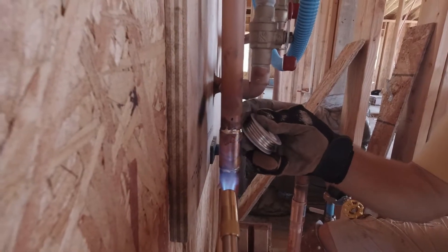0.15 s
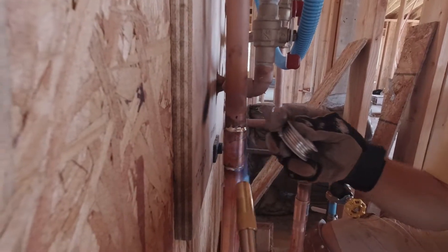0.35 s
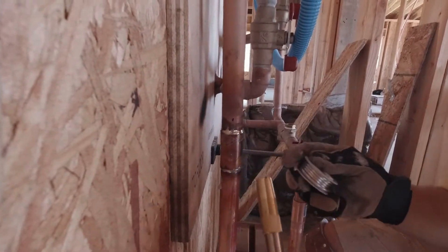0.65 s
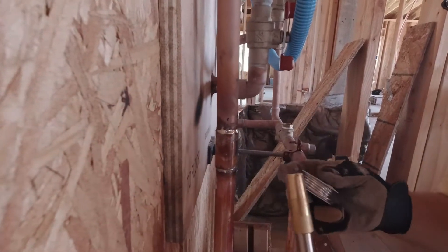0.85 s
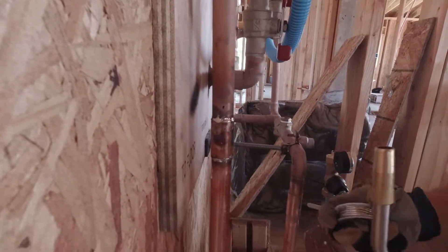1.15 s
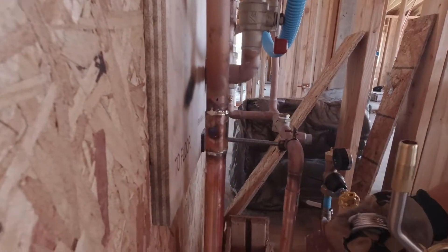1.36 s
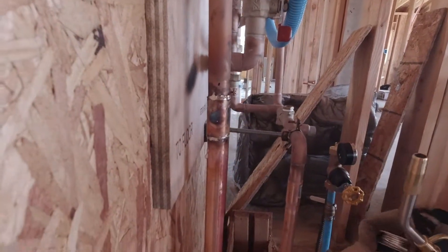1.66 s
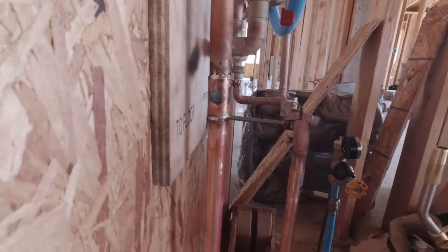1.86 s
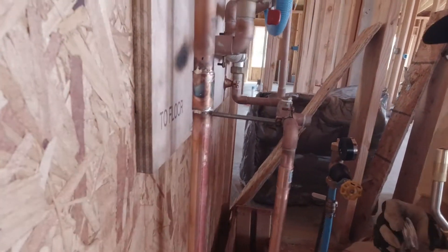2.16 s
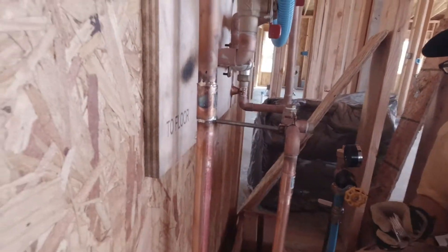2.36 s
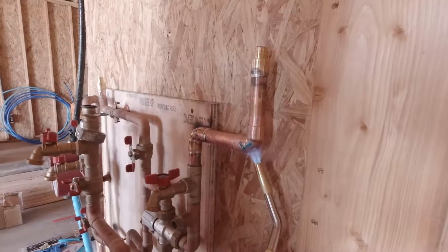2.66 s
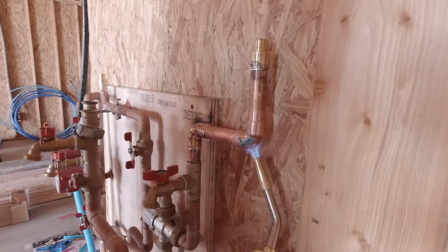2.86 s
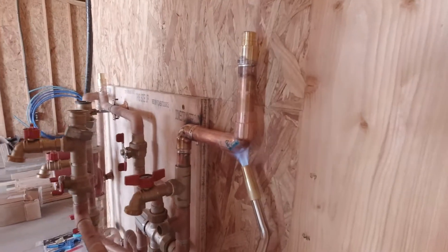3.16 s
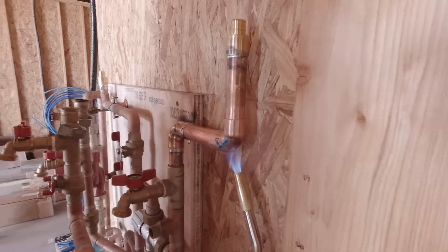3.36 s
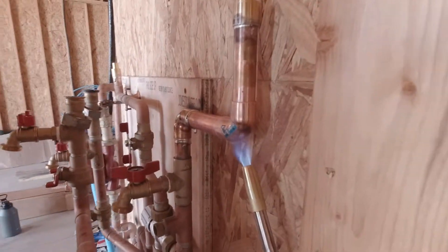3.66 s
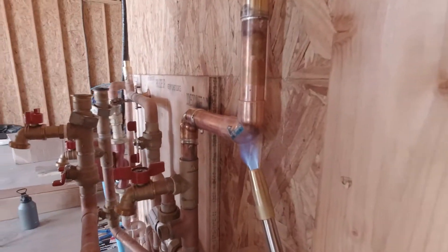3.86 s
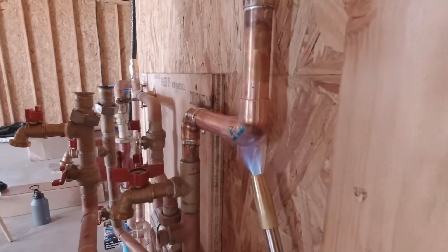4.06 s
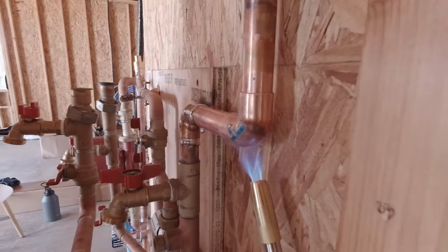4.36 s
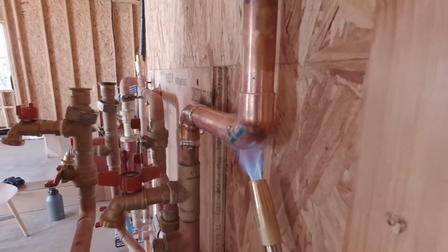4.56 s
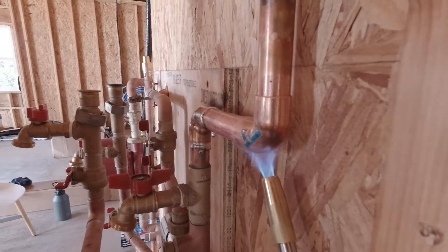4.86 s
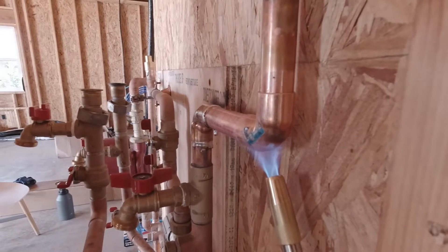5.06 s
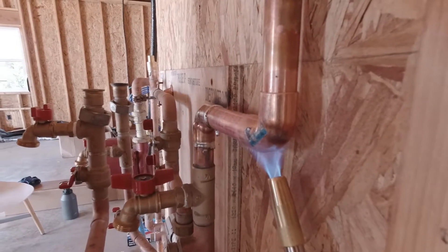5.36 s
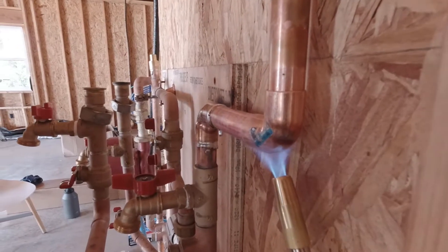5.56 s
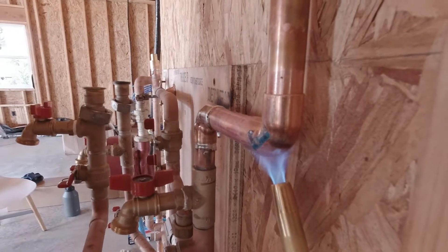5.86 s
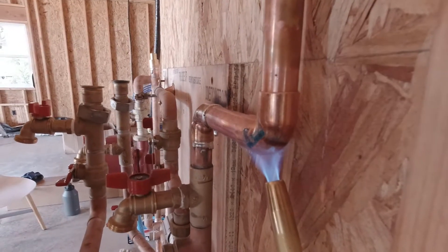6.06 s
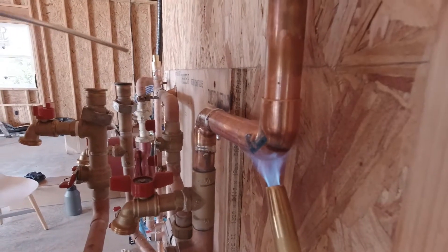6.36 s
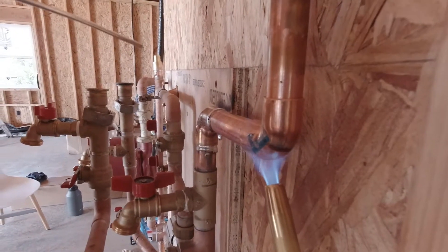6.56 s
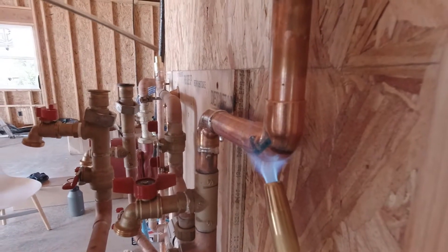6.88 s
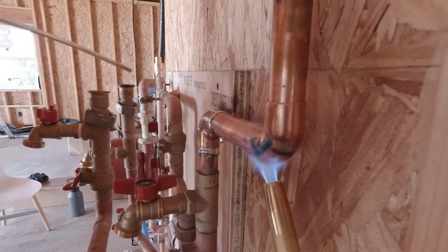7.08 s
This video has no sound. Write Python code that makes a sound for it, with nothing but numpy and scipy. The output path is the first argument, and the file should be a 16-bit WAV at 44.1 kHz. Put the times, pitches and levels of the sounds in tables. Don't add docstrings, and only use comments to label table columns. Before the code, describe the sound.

Close mono microphone at an unfinished wooden building site: a brief, breathy torch flame dies abruptly, popping twice. Nearly two quiet seconds follow, with light metallic ticks, cloth scuffs, a dull step, outdoor hush and low rumble. Then a torch is suddenly burning on copper pipe, with spitting flux, airy nozzle tones and a continuous roar that thickens as the microphone moves in.

```python
import sys
import numpy as np
from scipy import signal
from scipy.fft import rfft, irfft, next_fast_len
from scipy.io import wavfile
from scipy.ndimage import uniform_filter1d, map_coordinates

SR = 44100
rng = np.random.default_rng(int(sys.argv[2]) if len(sys.argv) > 2 else 0)


def waveform_to_disk(signal):
    frames = np.transpose(np.atleast_2d(signal))
    scaled = np.clip(frames, -1, 1) * 32767
    samples = np.round(scaled).astype(np.int16)
    wavfile.write(sys.argv[1], SR, samples)


def field_ratio(decibels):
    return 10 ** (np.asarray(decibels, dtype=float) / 20)


N = 318402
TIME = np.arange(N) / SR
SCENE_CHANGE_S = 2.4412
TRIGGER_RELEASE_S = 0.41


def unit(x):
    return x / np.sqrt(np.mean(x ** 2) + 1e-20)


def along(points, hz):
    point_hz, value = np.transpose(points)
    return np.interp(np.log(hz + 1), np.log(point_hz + 1), value)


def curves(rows):
    s, *columns = np.transpose(rows)
    return [np.interp(TIME, s, column) for column in columns]


def wobble(rate_hz):
    knots = rng.standard_normal(int(N * rate_hz / SR) + 4)
    return map_coordinates(knots, [TIME * rate_hz])


def swell(start_s, hold_s, level_db, rise_s, fall_s):
    early = np.maximum((start_s - TIME) / rise_s, 0)
    late = np.maximum((TIME - start_s - hold_s) / fall_s, 0)
    return field_ratio(level_db - 28 * early - 30.5 * late)


def filtered(x, response):
    size = next_fast_len(N + 8192)
    return irfft(rfft(x, size) * response(np.fft.rfftfreq(size, 1 / SR)), size)[..., :N]


def above(hz, edge_hz):
    return 1 / (1 + (edge_hz / (hz + 1)) ** 10)


def lift_db(peaks, hz):
    return sum(db / (1 + ((hz - centre) / (width / 2)) ** 2) for centre, width, db in peaks)


def bands(x, tone_db, splits):
    low, high = np.array([[1e-3, *splits], [*splits, 1e6]])[..., None]
    parts = filtered(x, lambda hz: field_ratio(tone_db(hz)) * above(hz, low) * (1 - above(hz, high)))
    return [unit(part) for part in parts]


def patchy(x, depth_db, size, bins, frames):
    hz, _, z = signal.stft(x, SR, nperseg=size)
    field = uniform_filter1d(rng.standard_normal(z.shape), max(round(bins), 1), 0)
    field = uniform_filter1d(field, max(round(frames), 1), 1)
    depth_db = depth_db * np.interp(hz, [800, 4000], [.45, 1])[:, None]
    return signal.istft(z * field_ratio(depth_db * unit(field)), nperseg=size)[1][:N]


FLAME_SPLITS = [1600, 3400, 4850, 7650, 11250]
# pitch_hz, level_db (per Hz)
FIRST_TONE = [(15, -52), (25, -35), (148, -7.5), (205, -1), (351, -8.5), (402, 0), (498, -2.5), (727, -9.5),
              (1060, -4.5), (1720, -8.5), (4540, -28), (5640, -25), (6450, -12), (9660, -26), (15700, -48)]
SECOND_TONE = [(15, -57), (25, -35.5), (152, -1), (283, -3), (435, -6.5), (570, -4.5), (1090, -6),
               (1280, -6.5), (1460, -8), (3970, -24), (5640, -18.5), (6280, -10.5), (10200, -8.5),
               (12700, -20.5), (15700, -42)]
# pitch_hz, width_hz, lift_db
FIRST_TUBE = [(480, 150, 1), (1680, 80, -3), (2440, 360, 2.5), (5250, 200, 9.5), (6580, 150, -1),
              (6800, 149.4, -8), (7400, 250, 3), (9440, 250, 6), (10500, 200, 2), (12800, 300, 7)]
SECOND_TUBE = [(306, 76, 4), (580, 190, 4), (1445, 110, 1.5), (2370, 43, 5.5), (2870, 490, 6),
               (3330, 160, 4.5), (4100, 430, 2.5), (6400, 500, -1), (8270, 560, 2), (9980, 230, 3.5),
               (12000, 360, -5)]
# start_s, roar_db, hiss_db, turn (nozzle toward the microphone, -1 to 1)
FIRST_BURN = [
    (0, -30, -39.5, 0),
    (.03, -26.5, -40.5, 0),
    (.19, -26.5, -39.5, 0),
    (.4, -27, -42.5, .3),
]
SECOND_BURN = [(2.44, -23, -37, 0.007), (3.2, -22.5, -35.5, -0.1), (3.4, -22, -39, .4),
               (3.62, -22, -37, .6), (3.8, -21.5, -32.5, 0.53), (4.1, -20.5, -36.5, 1),
               (4.5, -18.5, -38.5, 0.44), (5.1, -19, -38, .2), (5.55, -18.5, -38.5, .1),
               (5.9, -18.5, -38, -0.047), (6.451, -18.5, -38.5, -.1), (6.8, -19, -36, -0.87),
               (7.05, -16.5, -36, -.7), (7.22, -17.5, -37, -.8)]
# level_db, roar_share (0-1), hiss_share (0-1), turn_db (per turn)
FIRST_PARTS = [
    (0.5, 1, 0.051, -1.5),
    (-7.5, 0.47, 0, 3),
    (-23, 1, 0, -1),
    (0, 0, 1, -6),
    (-5, 0, 1, 2),
    (-19.5, 0, 1, 2),
]
SECOND_PARTS = [
    (0, 0.89, 0.26, 0),
    (-11, 0.87, 0.22, 0.6),
    (-20, 0.8, 0, 0.5),
    (-0.05, .05, 0.75, -4),
    (-0.65, .05, .99, 3.5),
    (-3.5, 0.82, .1, 2),
]
# middle_s, change_db, half_length_s
FLARES = [
    (3.71, 2.5, 0.024),
    (5.754, 4, 0.03),
    (6.47, -2, 0.02),
]


def flame(flow, burn, rules, tone, tube):
    roar_db, hiss_db, turn = curves(burn)
    for middle_s, change_db, half_s in FLARES:
        roar_db = roar_db + change_db * np.exp(-((TIME - middle_s) / half_s) ** 2)
    _, roar_mean, hiss_mean, _ = np.mean(burn, axis=0)
    roar_swing, hiss_swing = roar_db - roar_mean, hiss_db - hiss_mean
    parts = bands(flow, lambda hz: along(tone, hz) + lift_db(tube, hz), FLAME_SPLITS)
    means = 3 * [roar_mean] + 3 * [hiss_mean]
    out = np.zeros(N)
    for part, mean, (db, roar_share, hiss_share, turn_db) in zip(parts, means, rules):
        out += part * field_ratio(mean + db + roar_share * roar_swing + hiss_share * hiss_swing + turn_db * turn)
    return out


def gas():
    puffs = (rng.random(N) < 3000 / SR) * rng.random(N)
    puffs = filtered(puffs - puffs.mean(), lambda hz: 1 - above(hz, 2240))
    flow = patchy(rng.standard_normal(N) + 0.32 * unit(puffs), depth_db=1.0, size=512, bins=6, frames=20)
    flow = patchy(echoes(flow), depth_db=1.8, size=1024, bins=3, frames=32)
    return field_ratio(0.17 * wobble(12) + 0.25 * wobble(35)) * shadowed(flow)


# time_s, nearness (far 0 to near 1)
APPROACH = [
    (2.44, .01),
    (3.15, 0.033),
    (3.5, 0.53),
    (4.1, 0.93),
    (4.6, 0.96),
    (6.2, 1),
    (7.22, 1),
]


def nearness():
    first_joint = 0.78
    return np.where(TIME < SCENE_CHANGE_S, first_joint, np.clip(curves(APPROACH)[0], 0, 1))


# delay_s, strength (0-1)
BOARD_WALL = [(.00125, 0), (.0019, .2)]
CORNER = [(.0019, 0.055), (.0027, .07)]
# delay_s, strength
STUDS = [(.0007, -.15), (.0013, .1), (.00375, .12)]


def echoes(x):
    near = nearness()
    board = 0
    for far, close in (BOARD_WALL, CORNER):
        delay, strength = (a + (b - a) * near for a, b in zip(far, close))
        board = board + strength * np.interp(TIME - delay, TIME, x)
    board = filtered(board, lambda hz: 1 - .7 * above(hz, 3600))
    studs = filtered(x, lambda hz: sum(g * np.exp(-2j * np.pi * hz * s) for s, g in STUDS))
    return x + board + studs


# pitch_hz, width_hz, lift_db
FAR_COLOUR = [(425, 68, 5), (595, 137, -9.5), (913, 110, 4.5), (1300, 87, -3.5), (2050, 130, -5),
              (2943, 115, -10.5), (15000, 1500, 2)]


def shadowed(x):
    hz, t, z = signal.stft(x, SR, nperseg=1024)
    near = np.interp(t, TIME, nearness())
    glide = 0.38
    colour_db = np.sqrt(1 - near) * lift_db(FAR_COLOUR, hz[:, None] * (1 + glide * near))
    return signal.istft(z * field_ratio(colour_db), nperseg=1024)[1][:N]


# pitch_hz, width_hz
NOZZLE_TONES = [(6260, 230), (5765, 170), (5330, 160)]
# start_s, hold_s, level_db
SINGS = [
    [(2.44, 0.74, -40.5), (4.23, 0.14, -43), (5.7, 0.53, -45), (6.75, .4, -44)],
    [(2.44, .08, -39), (3.0, 0.24, -45), (3.75, 0.36, -51), (5.3, .4, -49), (6.8, .4, -47)],
    [(3.0, 0.33, -49), (3.75, .1, -48), (4.45, 0.069, -43), (6.0, .5, -50)],
]


def nozzle():
    centre_hz, width_hz = np.transpose(NOZZLE_TONES)[..., None]
    noise = rng.standard_normal(N)
    tones = filtered(noise, lambda hz: 1 / (1 + ((hz - centre_hz) / (width_hz / 2)) ** 2))
    out = np.zeros(N)
    for rows, tone in zip(SINGS, tones):
        murmur = field_ratio(-60)
        out += (murmur + sum(swell(*row, rise_s=.3, fall_s=.2) for row in rows)) * unit(tone)
    return out


# start_s, peak_db, pitch_hz, suction (toward +1 comes first, toward -1 last)
POPS = [
    (0.587, -17, 190, 0.85),
    (0.6276, -23.5, 170, -0.99),
]
# start_s, length_s, pitch_hz, level_db
WHISTLE = (.594, .049, 1430, -36)


def pops():
    out = np.zeros(N)
    for s, db, hz, suction in POPS:
        phase = (TIME - s) * hz * 2 * np.pi
        push = np.exp(-np.clip(phase - 1.1 * suction, -30, 30) ** 2)
        pull = np.exp(-np.abs(phase + 1.7 * suction) / 1.2)
        out += field_ratio(db) * (push - 0.73 * pull)
    s, length, hz, db = WHISTLE
    done = np.clip((TIME - s) / length, 0, 1)
    hz = hz - 290 * done ** 2
    db = db - 16 * done ** 2.4 + 4.0 + 1.6 * wobble(171)
    on = np.clip(np.minimum(done, 1 - done) / .06, 0, 1)
    return out + on * field_ratio(db) * np.sin(2 * np.pi * np.cumsum(hz) / SR)


def crack(db, bright_hz, t60, sharp):
    t = np.arange(SR // 20) / SR
    noise = rng.standard_normal(len(t)) * field_ratio(-60 * t / t60)
    peak = signal.iirpeak(min(bright_hz, 15000), sharp, SR)
    noise = signal.lfilter(*peak, signal.lfilter(*peak, noise)) + 0.12 * noise
    noise = signal.lfilter(*signal.butter(3, 12500, fs=SR), noise)
    return field_ratio(db) * noise / np.abs(noise).max()


def ring(db, hz, t60):
    t = np.arange(SR // 20) / SR
    return field_ratio(db - 60 * t / np.clip(t60, .004, .1)) * np.sin(2 * np.pi * hz * t)


def placed(hits):
    out = np.zeros(N + SR)
    for s, sound in hits:
        out[round(s * SR):][:len(sound)] += sound
    return out[:N]


# start_s, peak_db, bright_hz, ring_hz, ring_db (against peak_db)
TICKS = [(0.5364, -31, 9800, 2660, -1.5), (0.5863, -40, 4250, 1840, 3), (0.625, -45, 6000, 1610, 9),
         (0.6603, -42, 6500, 2200, 2), (0.6735, -43, 5090, 2220, 12.5), (0.7266, -41, 10000, 2110, -27),
         (0.9464, -54, 4890, 2580, -21), (1.1144, -49.5, 9540, 1700, -33), (1.276, -52, 8060, 3230, -24),
         (1.3314, -50, 7320, 3480, -12), (1.3803, -51, 6400, 2970, -11), (1.6506, -39, 8990, 2470, -21),
         (1.727, -45, 10500, 3460, -26), (1.74, -37.5, 7000, 3200, -20), (1.8786, -56, 3500, 3500, -16),
         (1.9016, -56, 4500, 3330, -14), (2.1874, -53, 3630, 3370, -7), (2.319, -40, 3580, 3400, -8)]
# start_s, peak_db, pitch_hz, t60_s (time to die by 60 dB)
KNOCKS = [
    (.5365, -33, 1080, .014),
    (.587, -28.5, 624, 0.023),
    (.6745, -29.5, 640, 0.051),
    (2.188, -56, 1530, .04),
    (2.189, -53, 2500, .04),
    (2.191, -54, 3050, .04),
    (2.192, -52, 3550, .04),
]


def ticks():
    hits = []
    for s, db, bright_hz, ring_hz, ring_db in TICKS:
        hits.append((s, ring(db + ring_db, ring_hz, t60=.0105) + crack(db, bright_hz, t60=0.018, sharp=1.3)))
    return placed(hits + [(s, ring(db, hz, t60)) for s, db, hz, t60 in KNOCKS])


# start_s, peak_db, pitch_hz
SPITS = [
    (2.606, -20, 6000),
    (2.787, -25, 5000),
    (4.11, -22, 9000),
]


def flux_spits():
    return placed([(s, crack(db, hz, t60=.04, sharp=3.3)) for s, db, hz in SPITS])


# full_pressure_s, rise_s, hold_s, level_db, weight_db (heavy strokes are duller)
SCUFFS = [
    (1.393, 0.054, .17, -63.5, 0.5),
    (1.498, 0.16, 0.09, -48, -26),
    (1.743, 0.052, 0.055, -63, -4),
    (1.943, .04, .01, -66, -8),
    (2.187, .008, 0.018, -62, -11),
    (2.29, .04, .01, -66, -1),
    (2.33, .03, 0.032, -55.5, 5.5),
]
# pitch_hz, level_db (per Hz)
CLOTH = [(180, -43), (300, -4), (758, -2), (1270, -4), (4770, -6), (9550, -11.5), (15700, -30.5)]
# pitch_hz, width_hz, lift_db
WEAVE = [(725, 150, 5), (1600, 200, 0), (2840, 200, 8), (3500, 250, 3), (5000, 700, 2), (6350, 400, 2)]


def scuffs():
    grain = rng.standard_normal(N) * field_ratio(1.5 * wobble(500))
    grain = patchy(grain, depth_db=2.1, size=512, bins=5, frames=8)
    dull, body, bright = bands(grain, lambda hz: along(CLOTH, hz) + lift_db(WEAVE, hz), [1200, 4000])
    out = np.zeros(N)
    for s, rise, hold, db, weight_db in SCUFFS:
        colour = bright + field_ratio(0.5 + 0.21 * weight_db) * body + field_ratio(weight_db) * dull
        out += swell(s, hold, db, rise, fall_s=0.14) * colour
    return out


# pitch_hz, t60_s (time to die by 60 dB)
ROOM = [(100, 1), (300, 0.98), (1000, 0.95), (2200, 0.32), (6000, 0.41), (14000, 0.18)]


def room(x):
    hz, t, z = signal.stft(rng.standard_normal(SR), SR, nperseg=256)
    tail = signal.istft(z * field_ratio(-60 * t / along(ROOM, hz)[:, None]), SR, nperseg=256)[1]
    late = np.pad(x, (220, 0))
    return signal.fftconvolve(late, tail / np.linalg.norm(tail))[:N]


# start_s, hold_s, level_db
CHIRPS = [
    (.86, 0.093, -66),
    (1.925, .1, -67),
]
# pitch_hz, level_db
WING = [(4850, 0), (4660, -4)]


def cricket():
    strokes = .75 + .25 * np.sin(2 * np.pi * 58 * TIME + 1.5 * wobble(20))
    wing = np.zeros(N)
    for hz, db in WING:
        wing += field_ratio(db + 2.2 * wobble(60)) * np.sin(2 * np.pi * hz * TIME + .28 * wobble(90))
    return unit(strokes * wing) * sum(swell(*chirp, rise_s=.04, fall_s=0.28) for chirp in CHIRPS)


# pitch_hz, level_db (per Hz)
HUSH = [(88, -26), (150, 4), (197, -4.5), (389, -8.5), (2000, -22), (3870, -22.5), (4700, -12), (6290, -27),
        (8260, -18.5), (11100, -19.5), (15700, -38)]
RUMBLE = [(8.8, -19), (15, 10), (30, -14), (44, -9), (91, -10), (130, -25.5), (300, -40), (390, -60.5),
          (660, -120)]
# pitch_hz, width_hz, lift_db
INSECTS = [(4730, 500, -3.5), (8450, 500, 5)]
# time_s, change_db
STIR = [
    (.45, 6),
    (.55, 8),
    (.76, 3.5),
    (1.25, -5),
    (1.4, 0),
    (1.55, 3),
    (1.8, 4),
    (2.15, 4.5),
    (2.3, 7),
]
# pitch_hz, level_db
HUM = (239, -74.5)


def background():
    hush = unit(filtered(rng.standard_normal(N), lambda hz: field_ratio(along(HUSH, hz) + lift_db(INSECTS, hz))))
    rumble = unit(filtered(rng.standard_normal(N), lambda hz: field_ratio(along(RUMBLE, hz))))
    stir_db, = curves(STIR)
    hush = field_ratio(-64 + .3 * stir_db + .6 * wobble(6.8)) * hush
    rumble = field_ratio(-56.5 + stir_db + 1.9 * wobble(12.0)) * rumble
    hum_hz, hum_db = HUM
    hum = field_ratio(hum_db + 2.5 + 1.7 * wobble(5.3)) * np.sin(2 * np.pi * hum_hz * TIME)
    return hush + rumble + hum


def scene():
    flow = gas()
    dying = field_ratio(-60 * np.clip(TIME - TRIGGER_RELEASE_S, 0, None) / 0.16)
    first = dying * flame(flow, FIRST_BURN, FIRST_PARTS, FIRST_TONE, FIRST_TUBE)
    handheld = ticks() + pops()
    rubs = scuffs()
    to_room = field_ratio(-18.5) * rubs + field_ratio(-19) * first + field_ratio(-27) * handheld
    before = first + handheld + rubs + room(to_room) + cricket()
    second = flame(flow, SECOND_BURN, SECOND_PARTS, SECOND_TONE, SECOND_TUBE)
    after = second + nozzle() + flux_spits()
    mono = background() + np.where(TIME < SCENE_CHANGE_S, before, after)
    return np.array([mono, mono])


def band_limit(x):
    return signal.sosfilt(signal.butter(12, 16090, fs=SR, output="sos"), x)


def record(dry):
    rounded = dry / (1 + np.abs(dry / .8) ** 4) ** (1 / 4)
    mix = filtered(rounded, lambda hz: hz < 15770)
    return band_limit(mix)


dry = scene()
out = record(dry)
waveform_to_disk(out)
```